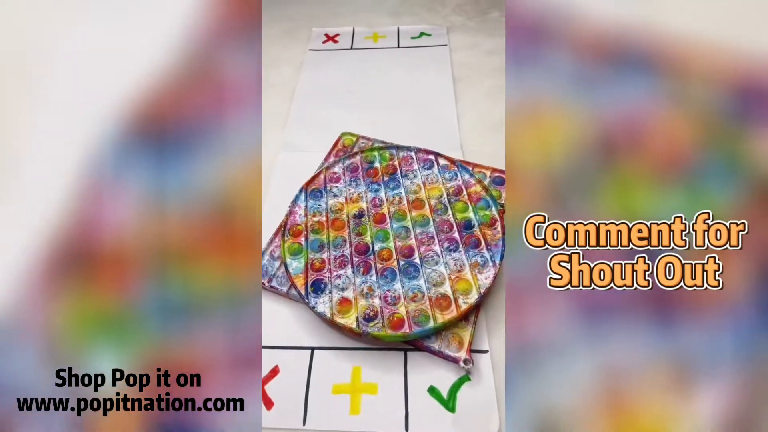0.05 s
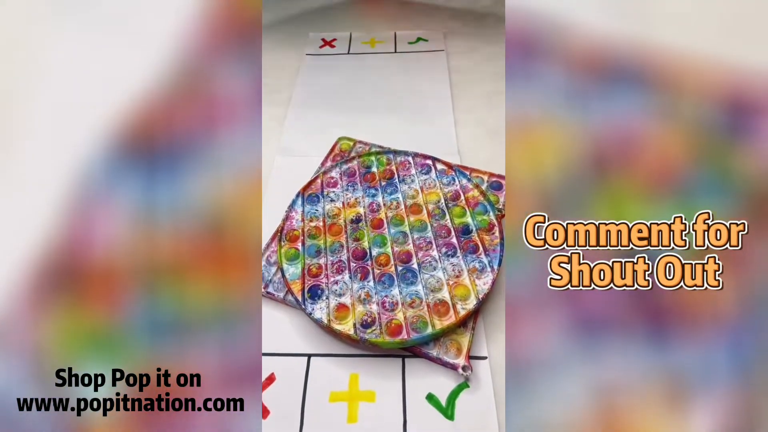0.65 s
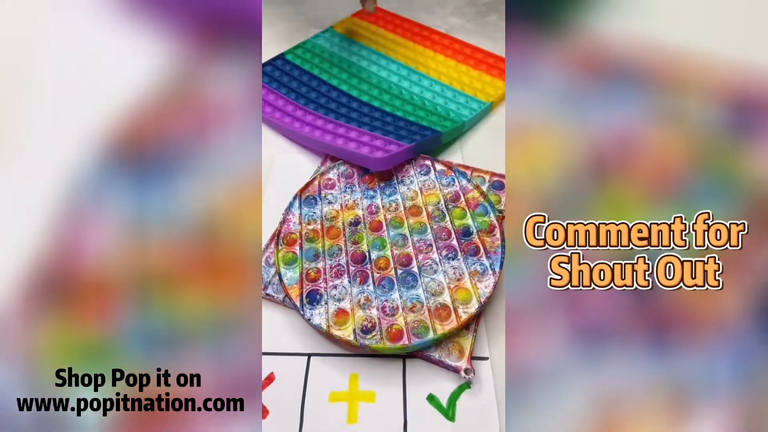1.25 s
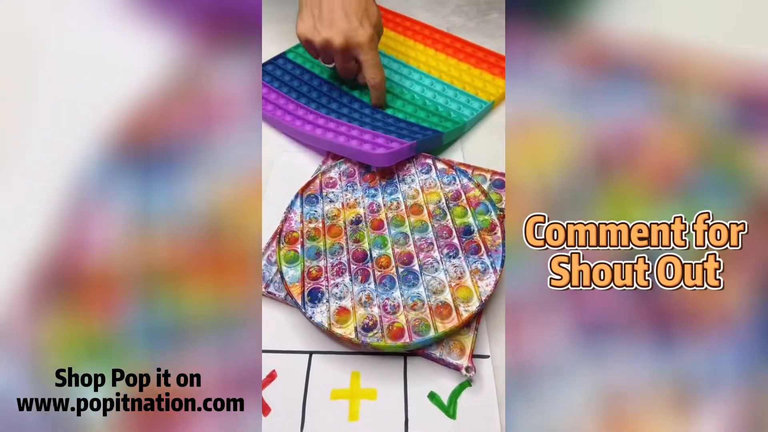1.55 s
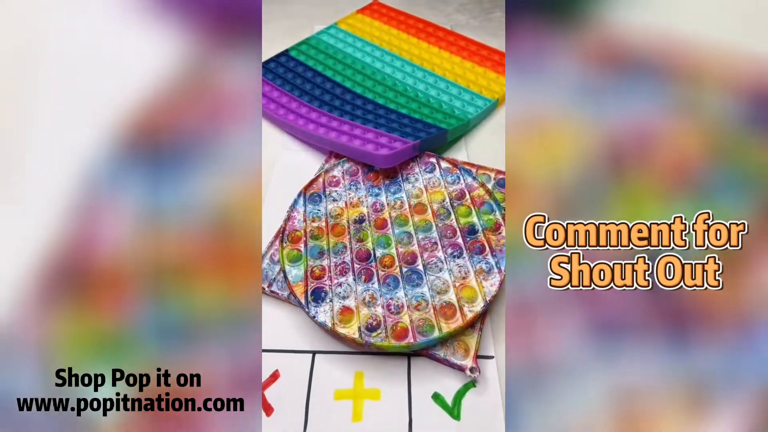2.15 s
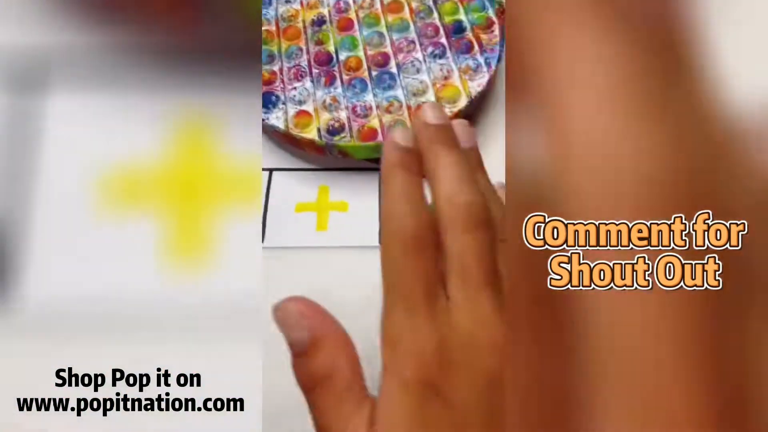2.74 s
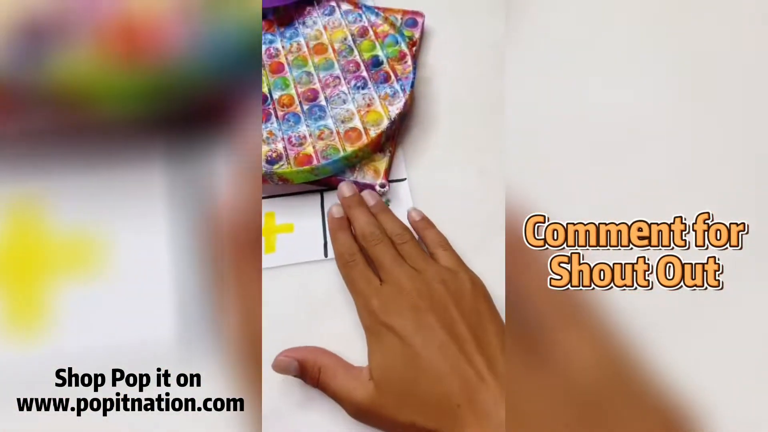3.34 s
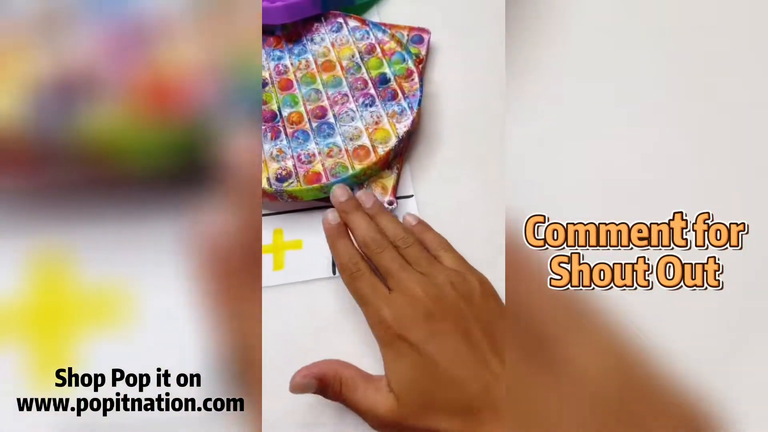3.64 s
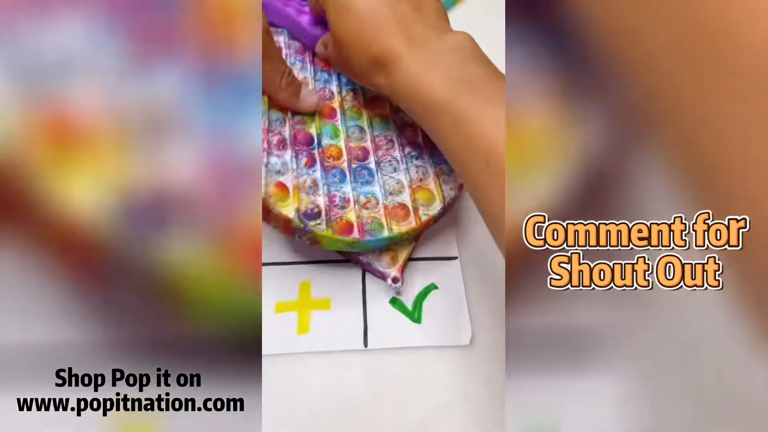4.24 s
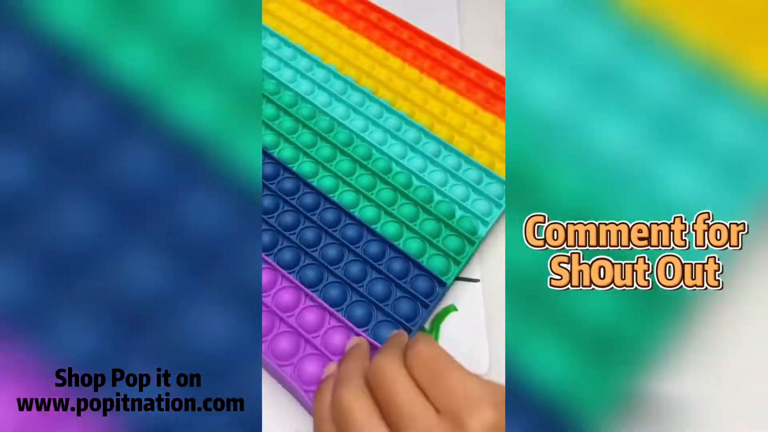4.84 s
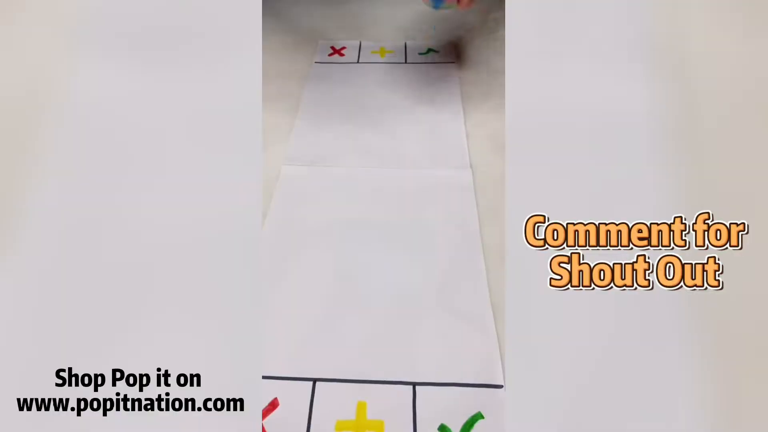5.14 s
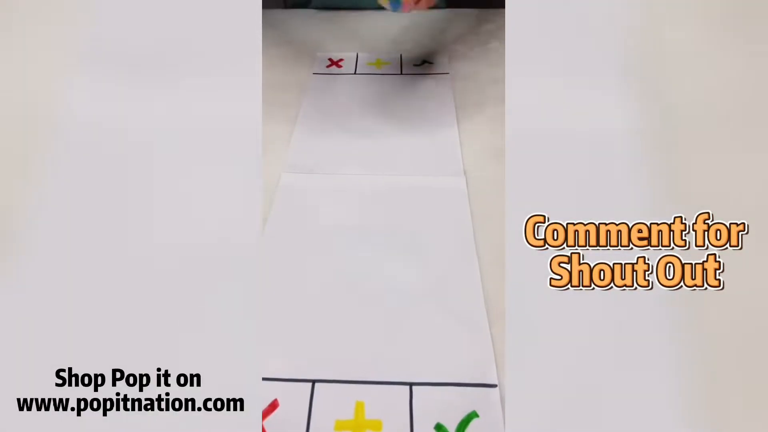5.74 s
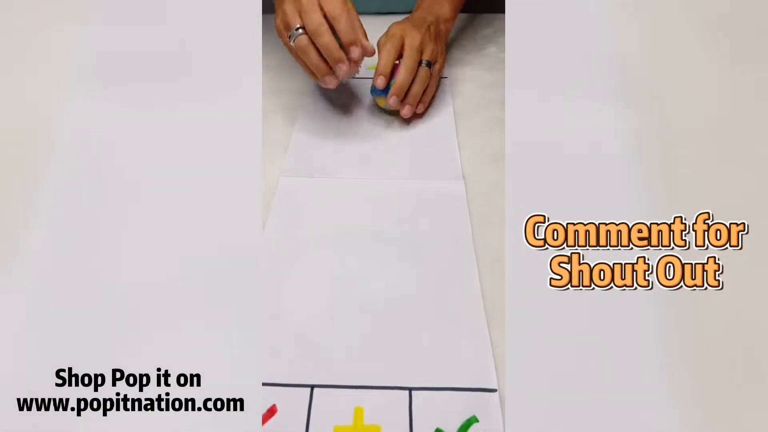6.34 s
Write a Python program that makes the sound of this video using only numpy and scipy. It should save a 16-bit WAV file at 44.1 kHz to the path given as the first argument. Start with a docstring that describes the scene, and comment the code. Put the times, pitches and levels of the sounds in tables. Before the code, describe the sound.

A limp silicone mat lands on a table with a squeak and a cluster of dull slaps, followed by a single bubble snap. Fingertip taps and soft paper brushing lead to more rubbery sliding, squeaking and another loud flop. The sound cuts out for an instant, then hollow plastic toys clack lightly. One microphone picks it all up in a small, lively room where an appliance hums throughout.

```python
"""In a small live room, over the steady hum of an appliance, a silicone bubble-popping mat squeaks by
stick-slip friction and flops onto a paper-covered table, whose top rings. One bubble snaps through.
Fingers tap and hands brush the paper; then a mat slides, squeaks and slaps down again. The sound
drops out briefly just before five seconds. Last, small hollow plastic toys are set down and ring."""
import sys
import numpy as np
from scipy import signal
from scipy.fft import rfft, irfft, next_fast_len
from scipy.io import wavfile
from scipy.ndimage import uniform_filter1d

SR = 44100
rng = np.random.default_rng(int(sys.argv[2]) if len(sys.argv) > 2 else 0)


def wav_record(signal):
    """Record a signal, one row per channel, as 16-bit PCM in the file named by sys.argv[1]."""
    frames = np.transpose(np.atleast_2d(signal))
    bounded = np.clip(frames, -1, 1)
    # unit amplitude maps onto the largest positive 16-bit level
    quanta = np.round(bounded * 32767).astype(np.int16)
    wavfile.write(sys.argv[1], SR, quanta)


N = 281467

# Spectra of mat contact and of friction hiss. Each row: frequency in Hz, level in dB.
MAT = [(50, -21), (120, -11.5), (220, -13), (300, -6.5), (480, 3), (760, -4.5), (1000, 0), (1350, 0),
       (1900, -7), (2600, -8.5), (3400, -19.5), (4600, -28.5), (5600, -31), (12000, -42.5), (16000, -52.5)]
HISS = [(2200, -20.5), (3400, 5.5), (4800, 2.5), (6500, 1), (8500, -2), (10500, -15.5), (16000, -45.5)]
# Modes of the table top. Each row: frequency in Hz, level in dB, T60 in seconds.
TABLE_MODES = [(406.6, 5, 0.065), (482, -2.5, 0.32), (586.5, 5, 0.28), (622.8, -12, 0.15), (729, -6, 0.09),
               (1083, 2, 0.058), (1275, 7.5, 0.0426), (1360, 7, 0.022), (2628, -14, 0.036)]


def flops():
    """Inelastic impact: limp silicone slaps down dully and excites the modes of the table."""
    # Each row: time in seconds, level in dB, softness from 0 to 1, crack in dB, room level in dB.
    landings = [(0.535, -51, 0.5, -0.5, 0.5), (0.743, -34, .45, 7, 6), (0.759, -25, .8, 3, 2.5),
                (0.802, -20, .25, 3.5, -6.5), (0.809, -14, .1, 1, -3), (0.8118, -8.5, 0.11, 2, 0),
                (0.829, -21, .85, -8, -2), (0.857, -29, 0.6, -9, 1), (0.953, -22, 0.46, -5, -0.5),
                (1.461, -38, 0.66, -3, 4.5), (4.514, -25, 0, 0.5, -4), (4.631, -16, .3, -3.5, -9.5),
                (4.650, -20.5, 0.9, -3.5, -6.5), (4.6645, -8, .05, 0, -4.5), (4.6703, -6.5, 0.2, 1.5, -3),
                (4.707, -14.5, .8, 1, -8.5), (4.725, -22.5, 0.5, 0.5, -3)]
    # Hardest, then softest contact. Each row: thud in dB, cavity frequency in Hz, T60 in seconds.
    touch = [(-4.5, 1200, 0.012), (12, 520, .07)]
    return impacts(landings, touch, MAT, TABLE_MODES, rise_s=0.0024, cavity_db=8.5, ring_db=-17)


def taps(room_db=-4.5):
    """Brief contact gives a broad spectrum: fingertips smack crisply on the paper."""
    # Each row: time in seconds, level in dB, softness from 0 to 1, crack in dB.
    strikes = [(2.188, -50, .05, 2), (2.896, -22.5, 0.17, 1.5), (2.902, -31, 0.7, 1), (3.044, -40, 1, 1),
               (3.262, -43.5, 0.3, 6.5), (3.314, -53, 0.2, 1), (3.339, -34.5, 0.6, 2.5),
               (3.474, -29, .15, 2.5), (3.612, -21.5, .1, 2.5), (3.622, -35.5, 0.73, -5)]
    # Hardest, then softest contact. Each row: thud in dB, cavity frequency in Hz, T60 in seconds.
    touch = [(-3.5, 1500, .017), (12.5, 1100, .085)]
    # Spectrum of struck paper. Each row: frequency in Hz, level in dB.
    paper = [(150, -44), (250, -4), (429, 5.5), (662, -7.5), (1280, 1.5), (1530, -7), (1760, 2), (1910, -3),
             (3400, -6.5), (4120, -18.5), (7060, -18), (12800, -25.5), (16000, -31)]
    rows = [(*row, room_db) for row in strikes]
    return impacts(rows, touch, paper, TABLE_MODES, rise_s=0.0014, cavity_db=7, ring_db=-20)


def toys(room_db=0.5):
    """Free vibration of a shell: light, hollow toys clack onto the table and ring briefly."""
    # Each row: time in seconds, level in dB, softness from 0 to 1, crack in dB.
    clacks = [(5.226, -32.5, 0.8, 1), (5.349, -30.5, 0.1, 1), (5.395, -34.5, 0.35, -10),
              (5.414, -42.5, 0.14, 6), (5.437, -39.5, 0.29, -7.5), (5.898, -33, 0.96, -1),
              (5.950, -37.5, 0.7, -2), (6.023, -36.5, 0.34, 0)]
    # Hardest, then softest contact. Each row: thud in dB, cavity frequency in Hz, T60 in seconds.
    touch = [(2, 770, 0.085), (6, 558.6, .07)]
    # Spectrum of struck plastic. Each row: frequency in Hz, level in dB.
    plastic = [(100, -17), (250, -1), (450, 1.5), (700, 0.5), (1100, 0), (1800, -5), (3000, -9),
               (4500, -12.5), (6300, -14), (9000, -21), (12000, -21), (16000, -24)]
    # Each row: frequency in Hz, level in dB, T60 in seconds.
    shell_modes = [(591.6, 2, 0.12), (724.6, 0, 0.255), (1244, -5.5, 0.0639), (4237, -2.5, 0.056),
                   (5837, 3.5, 0.0334)]
    rows = [(*row, room_db) for row in clacks]
    return impacts(rows, touch, plastic, shell_modes, rise_s=0.0017, cavity_db=10.5, ring_db=-9)


def pop(room_db=-0.5):
    """Snap-through buckling: a silicone dome flips inside out under one finger."""
    # Each row: time in seconds, level in dB, softness from 0 to 1, crack in dB.
    snaps = [(1.6565, -23.5, 0.21, -3)]
    # Hardest, then softest contact. Each row: thud in dB, cavity frequency in Hz, T60 in seconds.
    touch = [(-.5, 1150, 0.0115), (6, 700, .04)]
    # Spectrum of the dome. Each row: frequency in Hz, level in dB.
    dome = [(100, -24), (300, -7.5), (700, -4), (1100, -2), (1700, 0), (2200, -9), (3200, -8), (4800, -2.5),
            (6300, -13.5), (8500, -22.5), (12000, -39), (16000, -41)]
    rows = [(*row, room_db) for row in snaps]
    return impacts(rows, touch, dome, TABLE_MODES, rise_s=0.00028, cavity_db=7, ring_db=-33.5)


def impacts(rows, touch, body, modes, rise_s, cavity_db, ring_db):
    """Impact excitation: a burst of tiny contacts, coloured by body and trapped air, sets modes ringing."""
    # Bass and treble weightings. Each row: frequency in Hz, multiplier of the thud or crack in dB.
    thud = [(20, -5.2), (50, 3), (130, 1.6658), (250, 1.5), (600, 0.5)]
    crack = [(1500, -1.5), (5000, 1.5)]
    (hard_db, hard_hz, hard_s), (soft_db, soft_hz, soft_s) = touch
    out, t = np.zeros(N), np.arange(SR // 5) / SR
    lead_s = 0.02
    after = np.maximum(t - lead_s, 0)
    hz = np.geomspace(20, SR / 2, 200)
    for s, db, softness, crack_db, room_db in rows:
        # A softer contact thuds more and traps a deeper pocket of air.
        thud_db = hard_db + softness * (soft_db - hard_db)
        cavity_hz = hard_hz * (soft_hz / hard_hz) ** softness
        t60 = hard_s * (soft_s / hard_s) ** softness
        contact_db = along(body, hz) + thud_db * along(thud, hz) + crack_db * along(crack, hz)
        spectrum = np.c_[hz, contact_db + resonance(hz, cavity_hz, 0.066, cavity_db)]
        # The contact area grows quickly, then the surfaces settle.
        press = np.exp(np.minimum(t - lead_s, 0) / rise_s) * fade(after, t60)
        hit = crest(colour(rng.standard_normal(len(t)) * press, spectrum))
        ring = np.zeros(len(t))
        for mode_hz, mode_db, mode_t60 in modes:
            gain = amp(mode_db + rng.normal(0, 1)) * rng.choice([-1, 1])
            ring += gain * np.sin(2 * np.pi * mode_hz * after) * fade(after, mode_t60)
        add(out, s - lead_s, amp(db) * (hit + amp(ring_db) * crest(ring)))
        # The room collects sound from all directions, so its tail has the smooth average spectrum.
        pulse = colour(signal.unit_impulse(len(t)), spectrum)
        pulse *= np.linalg.norm(hit) / np.linalg.norm(pulse)
        add(out, s, amp(db + room_db) * room(pulse))
    return out


def pips(glide_s=0.0026, swell_cycles=1.2, gain_db=5.5, room_db=-22.5):
    """Damped oscillation: little pops and soft bumps fall in pitch as they die."""
    # Each row: start in seconds, relative level in dB, first and last pitch in Hz, T60 in seconds.
    bumps = [(0.828, -22.5, 96, 60, 0.106), (1.993, -35.5, 1320, 447, 0.0095),
             (2.228, -34, 1225, 244.1, 0.0325), (2.238, -39.5, 2850, 504, 0.0102),
             (3.085, -27, 80.9, 64, 0.187), (3.929, -41.5, 700, 477, 0.0454),
             (4.445, -32, 913, 843.7, 0.05), (4.706, -25, 109.6, 55, .1)]
    out, t = np.zeros(N), np.arange(SR // 4) / SR
    for s, db, start_hz, end_hz, t60 in bumps:
        hz = end_hz + (start_hz - end_hz) * np.exp(-t / glide_s)
        cycles = np.cumsum(hz) / SR
        envelope = (1 - np.exp(-cycles / swell_cycles)) * fade(t, t60)
        add(out, s, amp(db + gain_db) * envelope * np.sin(2 * np.pi * cycles))
    return out + amp(room_db) * room(out)[:N]


def squeaks(t60=0.011, smooth_rasp_db=-27, rough_rasp_db=-6.5, room_db=-6):
    """Stick-slip friction: each slip kicks a damped resonance of the mat; rough slipping rasps."""
    # Each row: start and length in seconds, first and last rate in slips per second, level in dB,
    # resonance in Hz, roughness from 0 to 1.
    rubs = [(0.652, 0.035, 270, 245, -41, 1300, .7), (0.67, .026, 390, 280, -37.5, 1330, 0.6),
            (0.695, 0.12, 350, 400, -46, 1350, .9), (4.080, .046, 530, 410, -47, 648, .3),
            (4.124, .036, 390, 490, -44.5, 771, .05), (4.168, 0.033, 490, 515, -40.5, 760, .3),
            (4.242, .041, 480, 720, -43, 952, .65), (4.279, 0.021, 460, 380, -31, 1000, .35),
            (4.299, 0.024, 690, 370, -38.5, 520, .5)]
    # Spectra of the rubber and of its rasp on paper. Each row: frequency in Hz, level in dB.
    rubber = [(100, -28), (400, 6.5), (1400, 2.5), (3000, -9.5), (5000, -20), (12000, -24.5)]
    paper_rasp = [(1200, -22.5), (1900, 2.5), (2400, 0), (3200, 4), (3800, -10), (4800, -25.5), (9000, -30)]
    out, t = np.zeros(N), np.arange(SR // 50) / SR
    for s, length, first_rate, last_rate, db, hz, roughness in rubs:
        n = int(length * SR)
        cycles = np.cumsum(np.linspace(first_rate, last_rate, n)) / SR
        slips = np.flatnonzero(np.diff(np.floor(cycles + .5)))
        shift, size = rng.standard_normal((len(slips), 2)).T
        grip = amp(2 * size) * np.sin(np.pi * (slips + 1) / (n + 1)) ** .5
        scatter_periods = 0.16 * roughness ** 2
        uneven_slips = np.clip(slips + shift * scatter_periods * SR / first_rate, 0, n - 1)
        kicks = np.bincount(uneven_slips.astype(int), grip, n + len(t))
        ring = signal.fftconvolve(kicks, np.sin(2 * np.pi * hz * t) * fade(t, t60))[:len(kicks)]
        rasp_db = smooth_rasp_db + roughness * (rough_rasp_db - smooth_rasp_db)
        rasp = amp(rasp_db) * unit(colour(kicks, paper_rasp))
        add(out, s, amp(db) * unit(unit(colour(ring, rubber)) + rasp))
    return out + amp(room_db) * room(out)[:N]


def drags(room_db=-4):
    """Intermittent contact: a dragged mat or a rocking toy chatters coarsely on the table."""
    # Each row: start and length in seconds, chatter level in dB, hiss level in dB.
    scrapes = [(0.77, 0.0255, -26.5, -60), (4.275, 0.048, -35.5, -56), (4.507, 0.0532, -36.5, -64.5),
               (4.629, 0.029, -23, -49), (4.762, 0.314, -49.5, -67.5), (5.377, .055, -46, -66.5),
               (5.959, 0.067, -49.5, -60.5)]
    out = np.zeros(N)
    for s, length, db, hiss_db in scrapes:
        n = int(length * SR)
        chatter = amp(db) * noise(MAT, n, grain_db=2)
        hiss = amp(hiss_db) * noise(HISS, n, grain_db=3.5)
        add(out, s, (chatter + hiss) * signal.windows.tukey(n, .15))
    return out + amp(room_db) * room(out)[:N]


def sliding():
    """Sliding friction: silicone moves heavily over the paper, with much scuff and little sheen."""
    # Each row: fastest moment, rise and fall in seconds, level in dB, scuff in dB relative to hiss.
    slides = [(0.422, .17, 0.24, -77.5, 15.5), (2.2, .12, 0.23, -68, 8), (2.478, .03, 0.1556, -50.5, 2),
              (3.80, .12, .17, -63.5, 9.5), (4.21, .22, .16, -56.5, 10), (4.42, .06, 0.062, -56.5, 3),
              (4.53, 0.077, 0.11, -55.5, 13.5)]
    return sum(amp(db) * stroke(s, rise, fall, scuff_db, sheen_db=-15.5, friction_hz=3743.5)
               for s, rise, fall, db, scuff_db in slides)


def brushing():
    """Light friction: skin skims the paper with a bright sheen."""
    # Each row: fastest moment and length in seconds, level in dB.
    brushes = [(0.178, 0.49, -76), (2.187, 0.09, -73.5), (2.233, 0.095, -64.5), (3.04, 0.097, -62),
               (3.16, 0.079, -66), (3.258, 0.12, -65.5), (3.404, .12, -72), (3.53, .08, -66.5),
               (3.692, 0.076, -55), (4.057, .17, -57), (4.30, 0.045, -55)]
    return sum(amp(db) * stroke(s, .4 * length, .6 * length, scuff_db=3, sheen_db=-1, friction_hz=4700)
               for s, length, db in brushes)


def stroke(s, rise, fall, scuff_db, sheen_db, friction_hz, drop_db=12):
    """Friction noise follows speed: a grainy rub swells until time s, then slows to rest."""
    # Low and high bands of the rub. Each row: frequency in Hz, level in dB.
    scuff = [(100, -18), (350, 9), (800, 4), (1400, 1), (2200, 1), (3000, -1), (4500, -24.5)]
    sheen = [(6500, -26.5), (9300, 0.5), (12000, -1.5), (16000, -10.5)]
    # Resonances of the paper sheet. Each row: frequency in Hz, relative width, lift in dB.
    sheet = [(1340, .08, 2), (1872, 0.1, 2.5), (3420, 0.042, 0)]
    out, t = np.zeros(N), np.arange(max(-2 * rise, -s), 2 * fall, 1 / SR)
    speed = amp(-drop_db * np.maximum(-t / rise, t / fall) ** 1.2)
    rub = unit(resonate(noise(HISS, len(t), grain_db=2), [(friction_hz, 0.52, 5)]))
    rub += amp(scuff_db) * noise(scuff, len(t), grain_db=2)
    rub += amp(sheen_db) * noise(sheen, len(t), grain_db=3)
    add(out, s + t[0], speed * resonate(rub, sheet))
    return out


def appliance(shaft_hz=58.55, rumble_db=-52, air_db=-57, waver_db=1.25):
    """Periodic forcing: a motor hums at harmonics of its shaft rate, over rumble and moving air."""
    # Each row: multiple of the shaft rate, rms level in dB.
    harmonics = [(1, -51.5), (2, -40.5), (3, -55), (4, -63.5), (6, -68.5)]
    # Noise spectra. Each row: frequency in Hz, level in dB.
    rumble = [(20, -52), (35, -20.5), (47, 8.5), (64, 12.5), (85, 6.5), (150, 6.5), (220, -8.5), (320, -51)]
    air = [(120, -31), (200, -11), (240, -6), (300, -14.5), (360, -14), (480, -17), (900, -28),
           (1200, -25.5), (1800, -30.5), (2300, -33.5), (5500, -42.5), (11000, -50.5), (16000, -70)]
    angle = 2 * np.pi * shaft_hz * np.arange(N) / SR + 0.026 * wobble(1.2)
    hum = np.zeros(N)
    for multiple, db in harmonics:
        gain = np.sqrt(2) * amp(db + waver_db * wobble(1.3))
        hum += gain * np.sin(multiple * angle + rng.uniform(0, 2 * np.pi))
    return hum + amp(rumble_db) * noise(rumble, N) + amp(air_db) * noise(air, N)


def drones():
    """Slow modulation of phase and level makes faint, low tones waver under the hum."""
    # Each row: start and end in seconds, frequency in Hz, rms level in dB.
    tones = [(0, 3.854, 69.67, -55), (5.049, 6.38, 44.9, -51.5)]
    out = np.zeros(N)
    for start, end, hz, db in tones:
        n = int((end - start) * SR)
        tone = np.sqrt(2) * np.sin(2 * np.pi * hz * np.arange(n) / SR + .4 * wobble(2.4, n))
        add(out, start, amp(db + 1.5 * wobble(2.2, n)) * tone * signal.windows.tukey(n, .1))
    return out


def room(x, build_s=0.00062):
    """Diffuse reverberation: x is convolved with a fresh noise tail that lasts longest in the bass."""
    # Each row: frequency in Hz, T60 in seconds.
    decay_times = [(100, 1), (400, 0.2856), (1000, 0.472), (2500, 0.422), (6000, .42), (14000, 0.33)]
    # Each row: frequency in Hz, reflected level in dB.
    walls = [(80, -12.5), (300, 0), (600, 3), (1200, -9.5), (2500, -7), (6000, -5), (14000, -2.5)]
    hz, t, bands = signal.stft(rng.standard_normal(SR // 2), SR, nperseg=256)
    envelope = fade(t, along(decay_times, hz)[:, None]) * (1 - np.exp(-t / build_s)) ** 2
    tail = signal.istft(bands * envelope, SR)[1]
    return signal.fftconvolve(x, colour(tail / np.linalg.norm(tail), walls))


def resonance(hz, centre_hz, width, lift_db):
    """A bell-shaped peak in dB on a logarithmic frequency axis."""
    return lift_db / (1 + (np.log(hz / centre_hz) / width) ** 2)


def resonate(x, peaks):
    """Zero-phase filtering by a set of resonance peaks."""
    hz = np.fft.rfftfreq(len(x), 1 / SR) + 1
    lift_db = sum(resonance(hz, *peak) for peak in peaks)
    return irfft(rfft(x) * amp(lift_db), len(x))


def colour(x, points):
    """Minimum-phase filtering to a (Hz, dB) shape; folding the cepstrum makes it causal."""
    m = 2 * next_fast_len(len(x) // 2 + 1024, True)
    gain = amp(along(points, np.fft.rfftfreq(m, 1 / SR)))
    cepstrum = irfft(np.log(gain + 1e-6))
    cepstrum[1:m // 2] *= 2
    cepstrum[m // 2 + 1:] = 0
    return irfft(rfft(x, m) * np.exp(rfft(cepstrum)))[:len(x)]


def noise(points, size, grain_db=0):
    """Coloured noise of rms 1; amplitude modulation by grain_db breaks it into millisecond grains."""
    return unit(colour(rng.standard_normal(size) * amp(grain_db * wobble(700, size)), points))


def wobble(rate, size=N):
    """Linear interpolation between random knots, rate of them a second."""
    knots = rng.standard_normal(int(size * rate / SR) + 4)
    return np.interp(np.arange(size) * rate / SR, np.arange(len(knots)), knots)


def along(points, hz):
    """Interpolation of (Hz, value) points on a logarithmic frequency axis."""
    knots_hz, values = np.transpose(points)
    return np.interp(np.log(hz + 1), np.log(knots_hz), values)


def fade(t, t60):
    """Exponential decay by 60 dB in t60 seconds."""
    return amp(-60 * t / np.maximum(t60, .002))


def amp(db):
    """Decibels to amplitude ratio."""
    return 10 ** (np.asarray(db) / 20)


def unit(x):
    """Normalisation to rms 1."""
    return x / np.sqrt(np.mean(x ** 2) + 1e-20)


def crest(x):
    """Normalisation of the loudest four milliseconds to rms 1."""
    return x / np.sqrt(uniform_filter1d(x ** 2, size=176).max() + 1e-20)


def add(track, s, x):
    """Superposition of x on track from time s."""
    start = max(round(s * SR), 0)
    track[start:start + len(x)] += x[:max(N - start, 0)]


def scene():
    """Superposition: the pressures of all sources sum at one microphone."""
    knocks = flops() + taps() + toys() + pop() + pips()
    friction = squeaks() + brushing() + sliding() + drags()
    return (knocks + friction + appliance() + drones())[None]


def record(dry, ceiling=0.95, gap_start_s=4.915, gap_end_s=5.062, gap_db=-42, top_hz=15800):
    """Soft saturation rounds the peaks, the level drops out briefly, and a low-pass cuts the top."""
    t = np.arange(N) / SR
    rounded = dry / (1 + np.abs(dry / ceiling) ** 4) ** (1 / 4)
    dropout = np.where((t > gap_start_s) & (t < gap_end_s), amp(gap_db), 1)
    passband = np.fft.rfftfreq(N, 1 / SR) < top_hz
    return irfft(rfft(rounded * dropout) * passband, N)


dry = scene()
out = record(dry)
wav_record(out)
```